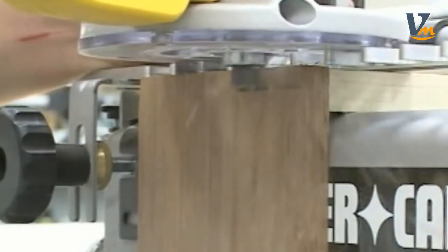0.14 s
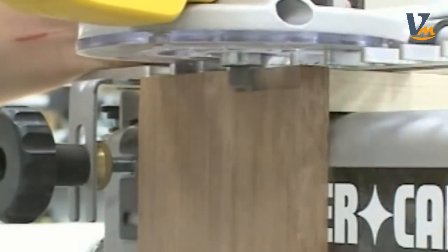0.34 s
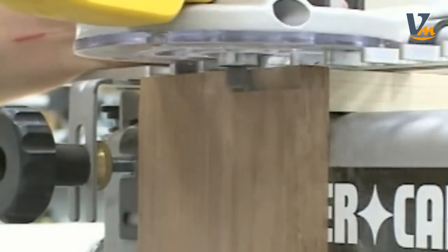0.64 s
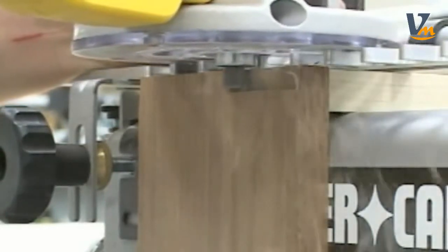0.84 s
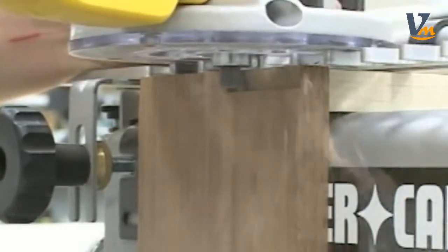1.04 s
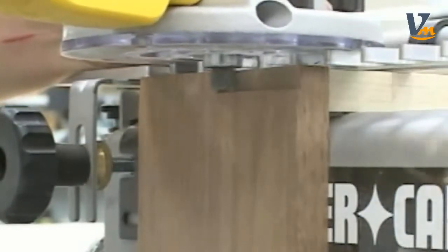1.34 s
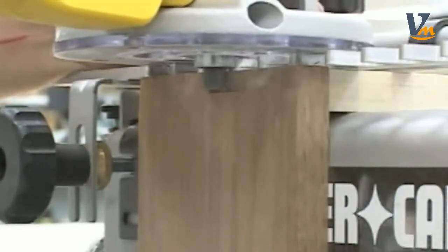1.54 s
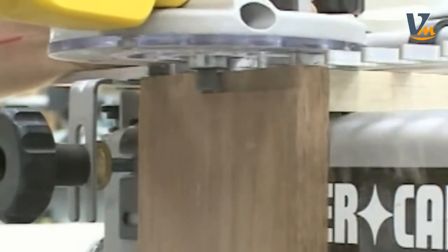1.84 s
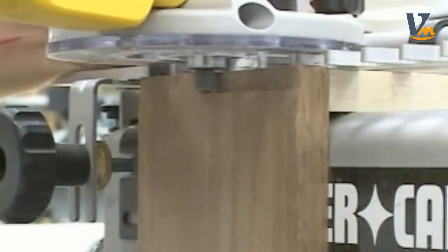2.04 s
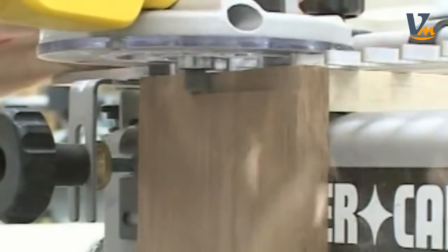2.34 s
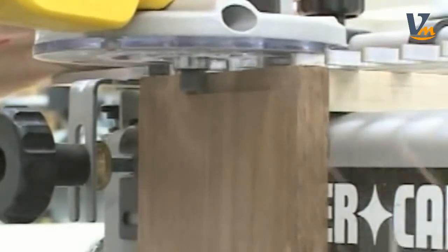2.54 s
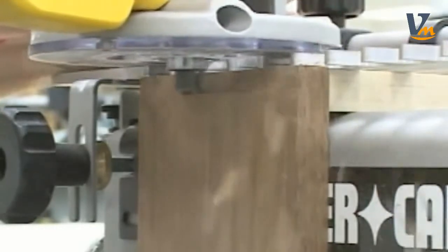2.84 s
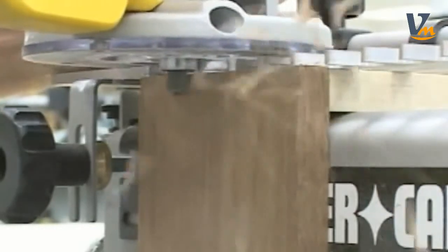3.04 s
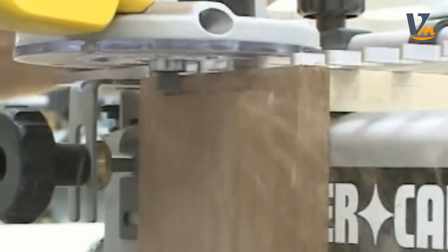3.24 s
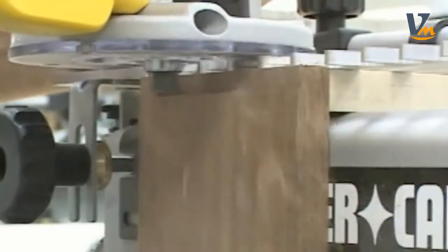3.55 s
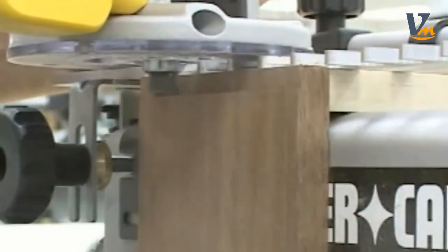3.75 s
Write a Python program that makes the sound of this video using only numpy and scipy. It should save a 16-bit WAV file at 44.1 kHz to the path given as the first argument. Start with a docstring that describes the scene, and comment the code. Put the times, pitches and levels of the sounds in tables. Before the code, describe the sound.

An electric router runs at high speed, trimming a wooden board in a workshop. Its steady whine and airy hiss continue throughout, while ringing cutting tones swell and fade and the pitch sags slightly. The microphone is close.

```python
"""A workshop: a hand router trims the end of a wooden board, close to a mono microphone.
The shaft turns about 400 times a second and sags under load. The two-edged bit sings on even
multiples (orders) of that rate, the motor and a bearing whine, and cooling air hisses harder
the faster the shaft turns."""
import sys
import numpy as np
from scipy.fft import rfft, irfft, next_fast_len
from scipy.io import wavfile
from scipy.ndimage import map_coordinates

SR = 44100
rng = np.random.default_rng(int(sys.argv[2]) if len(sys.argv) > 2 else 0)


def unload_audio(sound):
    """Save the sound as a 16-bit wav file, at the path given as the first command line argument."""
    columns = np.transpose(np.atleast_2d(sound))
    # keep every value between -1 and 1, then stretch to whole-number steps
    steps = np.round(np.clip(columns, -1, 1) * 32767)
    wavfile.write(sys.argv[1], SR, steps.astype(np.int16))


N = 171990


def amp(db):
    """Decibels to gain."""
    return 10 ** (np.asarray(db) / 20)


def unit(x):
    """Scale to rms 1."""
    return x / np.sqrt(np.mean(x ** 2) + 1e-20)


def along(points, hz):
    """Interpolate (freq_hz, value) points on a log frequency axis."""
    freq_hz, values = np.transpose(points)
    return np.interp(np.log(hz + 1), np.log(freq_hz + 1), values)


def curve(points):
    """Interpolate (time_s, value) points to one value per sample."""
    time_s, values = np.transpose(points)
    return np.interp(np.arange(N) / SR, time_s, values)


def wobble(rate_hz):
    """Smooth random curve, rate_hz knots a second."""
    knots = rng.standard_normal(int(N * rate_hz / SR) + 4)
    return map_coordinates(knots, [np.arange(N) * rate_hz / SR])


def filtered(x, response):
    """Zero-phase filter with gain response(hz)."""
    size = next_fast_len(N + SR // 2)
    hz = np.fft.rfftfreq(size, 1 / SR)
    return irfft(rfft(x, size) * response(hz), size)[..., :N]


def tone(angle, order, level_db, waver_db, waver_hz):
    """One partial locked to the shaft angle, its level wavering."""
    phase = rng.uniform(0, 2 * np.pi)
    rms = amp(level_db + waver_db * wobble(waver_hz))
    return np.sqrt(2) * rms * np.sin(order * angle + phase)


def air(excess_hz):
    """Cooling air rushes through the housing: low roar and broad hiss, both rising with shaft speed."""
    # freq_hz, relative_density_db
    spectrum = [(22, -20), (108, -23.5), (258, -19.5), (452, -11), (603, -4.5), (646, 0.1), (1034, 1),
                (1077, -12.5), (1120, -0.5), (1249, -8.5), (1292, -2.5), (1421, -1.5), (1658, -2),
                (1787, -6), (2950, -5), (3402, -6), (3661, -0.5), (4931, -1), (5771, -6), (6245, -1.5),
                (7343, -11), (7644, -8.5), (8290, -17), (9001, -17), (9776, -13.5), (10185, -20.5),
                (11542, -12.5), (13652, -22), (14233, -24), (15482, -32)]
    # Slight dips where the bit sings loudest: time_s, gain_db
    dips = [(0, 0), (1.2, 0.3), (1.52, -0.5), (1.9, .5), (2.22, 0.2), (2.36, -1.5), (2.52, 1), (3.1, -1),
            (3.28, -0.6), (3.6, 0.2), (3.9, 0)]
    # Roar against hiss: time_s, gain_db
    roar_gain = [(0, 0), (1.34, 0), (1.39, -1.2), (1.7, 0), (2.1, 1.2), (3.08, 0.5), (3.9, 1.6)]
    base_db, speed_db_per_hz, flutter_db, roar_top_hz = -44.5, 0.16, 0.34, 1090
    rush = unit(filtered(rng.standard_normal(N), lambda hz: amp(along(spectrum, hz))))
    roar = filtered(rush, lambda hz: hz < roar_top_hz)
    hiss = rush - roar
    flow_db = base_db + speed_db_per_hz * excess_hz + curve(dips) + flutter_db * wobble(20)
    return amp(flow_db) * (hiss + amp(curve(roar_gain)) * roar)


def bearing(angle):
    """Ball passes fall just under motor orders 5 and 7 and beat against them: a fast, even rattle."""
    # Ball-pass tone and its upper sideband: time_s, level_db
    ball_pass = [(0, -73), (.45, -55), (1.28, -53), (1.45, -62), (3.4, -61.5), (3.9, -57)]
    sideband = [(0, -55), (.9, -61), (1.3, -55.5), (2.9, -57), (3.4, -58), (3.9, -60)]
    pass_order = 4.863
    return sum(tone(angle, order, curve(levels), waver_db=2, waver_hz=6.73)
               for order, levels in ((pass_order, ball_pass), (pass_order + 2, sideband)))


def motor(angle, excess_hz):
    """Rotor and fan whine over a weak buzz that grows with speed; a breathy band surrounds order 2."""
    # Main tones, named by shaft order: time_s, level_db
    whine_1 = [(0, -71), (.4, -64), (.9, -72), (1.6, -65), (2.2, -68.5), (2.8, -70.5), (3.1, -79),
               (3.55, -68), (3.9, -71.5)]
    whine_2 = [(0.0, -54.5), (.3, -52), (.8, -56.5), (1.22, -59), (1.35, -53.5), (1.39, -62), (2.7, -65),
               (3.89, -56.5)]
    whine_5 = [(0.0, -69), (.28, -58), (1.2, -61.5), (2.03, -65), (3.17, -56.5), (3.38, -68), (3.89, -63)]
    whine_7 = [(0.0, -66), (0.8, -62), (1.25, -50), (1.55, -53.5), (1.75, -61), (2.22, -50.5), (2.35, -57),
               (2.92, -52), (3.05, -63.2), (3.89, -58)]
    whine_11 = [(0.0, -60), (0.95, -59), (1.01, -70.2), (1.45, -51), (2.23, -68), (2.33, -55.6),
                (2.71, -63), (3.11, -49.7), (3.89, -57.5)]
    whine_15 = [(0.0, -70), (0.51, -63.3), (0.55, -72), (1.53, -52.5), (2.29, -61), (2.35, -69),
                (3.89, -58)]
    whine_19 = [(0.0, -59), (.28, -56.5), (0.62, -53), (1.17, -63), (1.35, -55.5), (2.1, -51.5),
                (2.35, -55), (2.9, -54), (3.89, -52.0)]
    whine_24 = [(0, -77), (.3, -62), (.75, -71), (3.9, -76)]
    whine_29 = [(0, -78), (.25, -71), (1.1, -70), (1.7, -84), (3.9, -81)]
    # Rotor buzz at mean speed: order, level_db
    buzz_tones = [(3, -67.5), (9, -67), (18, -66), (20, -71.5), (21, -72), (27, -81), (28, -73.5)]
    buzz_db_per_hz, fuzz_gain_db, fuzz_width_hz = 0.19, -3.5, 110
    whine_tones = {1: whine_1, 2: whine_2, 5: whine_5, 7: whine_7, 11: whine_11,
                   15: whine_15, 19: whine_19, 24: whine_24, 29: whine_29}
    whine = sum(tone(angle, order, curve(levels), waver_db=1.24, waver_hz=9)
                for order, levels in whine_tones.items())
    buzz = sum(tone(angle, order, db + buzz_db_per_hz * excess_hz, waver_db=2.35, waver_hz=8)
               for order, db in buzz_tones)
    fuzz = wobble(fuzz_width_hz) * np.sin(2 * angle) + wobble(fuzz_width_hz) * np.cos(2 * angle)
    return whine + buzz + amp(curve(whine_2) + fuzz_gain_db) * fuzz


def bit(angle):
    """Two edges strike the wood each turn; uneven grain roughens all their tones together."""
    # Cutting tones, named by shaft order: time_s, level_db
    cut_4 = [(0.0, -74), (1.16, -61), (1.9, -75), (2.33, -52.5), (2.44, -61), (2.98, -53), (3.15, -52),
             (3.4, -46.5), (3.59, -55.5), (3.89, -58)]
    cut_6 = [(0.0, -71), (0.23, -53), (.62, -55.5), (1.08, -47.5), (1.28, -47.5), (1.45, -41.3),
             (1.72, -41), (1.81, -49.5), (2.1, -57), (2.27, -43.5), (2.36, -42), (2.48, -63), (2.57, -48.5),
             (2.73, -67), (2.89, -49.5), (3.1, -55), (3.4, -43.6), (3.59, -53), (3.72, -48), (3.89, -56)]
    cut_8 = [(0.0, -60.4), (0.15, -70), (0.23, -58), (1.72, -57), (1.84, -66), (2.13, -65), (2.32, -53),
             (2.5, -59.5), (2.8, -60.5), (2.95, -52), (3.22, -55.5), (3.6, -64), (3.89, -59)]
    cut_10 = [(0.0, -53), (0.14, -56), (0.35, -45.5), (0.62, -55.5), (0.75, -51), (1.5, -53.5),
              (1.71, -51.5), (2.17, -55.5), (2.35, -41), (2.47, -54), (2.58, -44.5), (2.69, -52.5),
              (2.81, -64), (2.88, -47.5), (2.97, -45), (3.13, -46.5), (3.21, -43.5), (3.52, -55.5),
              (3.89, -52.5)]
    cut_12 = [(0.0, -59), (0.22, -50.5), (0.52, -67), (.8, -62), (0.95, -55), (1.42, -60), (1.58, -49.5),
              (2.12, -61), (2.36, -47.5), (2.47, -52), (2.61, -47), (2.79, -54.5), (3.0, -44.5),
              (3.22, -44), (3.67, -67), (3.89, -63)]
    cut_16 = [(0.0, -70), (1.1, -63), (1.42, -52), (1.72, -49), (1.88, -56), (2.15, -61.5), (2.34, -49.5),
              (2.47, -60), (3.3, -69), (3.45, -57.5), (3.89, -55)]
    # High overtones at mean bite: order, level_db
    rasp_tones = [(13, -63.5), (14, -64.5), (17, -67), (26, -74), (30, -77), (32, -76), (38, -86)]
    rasp_db_per_db, grain_db = 0.63, 0.5
    cut_tones = {4: cut_4, 6: cut_6, 8: cut_8, 10: cut_10, 12: cut_12, 16: cut_16}
    cut = sum(tone(angle, order, curve(levels), waver_db=0.5, waver_hz=14)
              for order, levels in cut_tones.items())
    bite_db = 10 * np.log10(sum(amp(curve(levels)) ** 2 for levels in cut_tones.values()))
    rise_db = rasp_db_per_db * (bite_db - bite_db.mean())
    rasp = sum(tone(angle, order, db + rise_db, waver_db=2, waver_hz=9) for order, db in rasp_tones)
    return (cut + rasp) * amp(grain_db * wobble(150))


def scene():
    """One shaft drives every layer; both channels are identical."""
    # Shaft speed: time_s, rate_hz
    speed = [(0.0, 407), (0.2, 407.2), (0.44, 404.2), (0.89, 403), (1.33, 399.5), (1.81, 392.4),
             (2.21, 396.8), (2.28, 396), (2.39, 393.5), (2.68, 393.3), (2.87, 396), (3.2, 392),
             (3.42, 388.1), (3.48, 387.4), (3.64, 390.7), (3.73, 390), (3.89, 392.5)]
    jitter_rad = 0.0042
    shaft_hz = curve(speed)
    angle = 2 * np.pi * np.cumsum(shaft_hz) / SR + jitter_rad * wobble(60)
    excess_hz = shaft_hz - shaft_hz.mean()
    router = bit(angle) + motor(angle, excess_hz) + bearing(angle) + air(excess_hz)
    return np.array([router, router])


def record(dry):
    """Brick-wall low-pass."""
    return filtered(dry, lambda hz: hz < 15700)


dry = scene()
out = record(dry)
unload_audio(out)
```